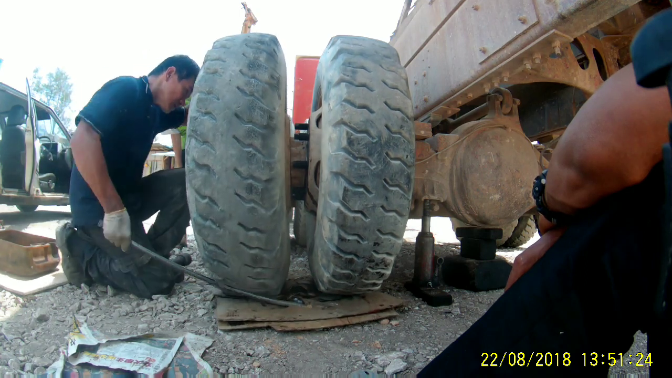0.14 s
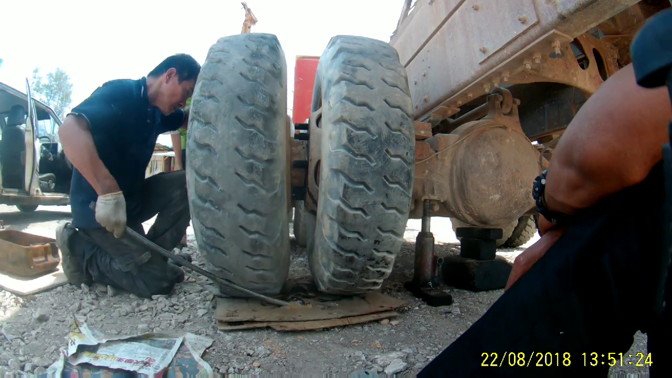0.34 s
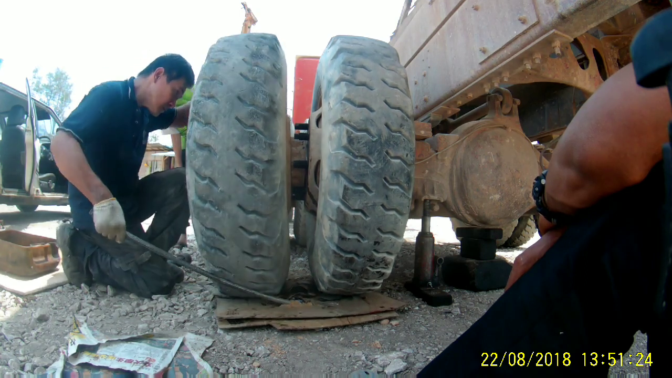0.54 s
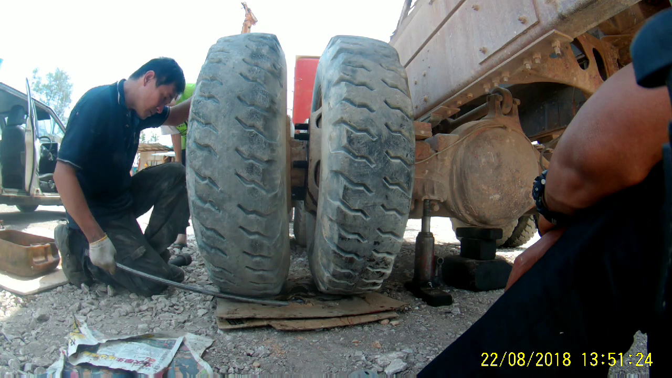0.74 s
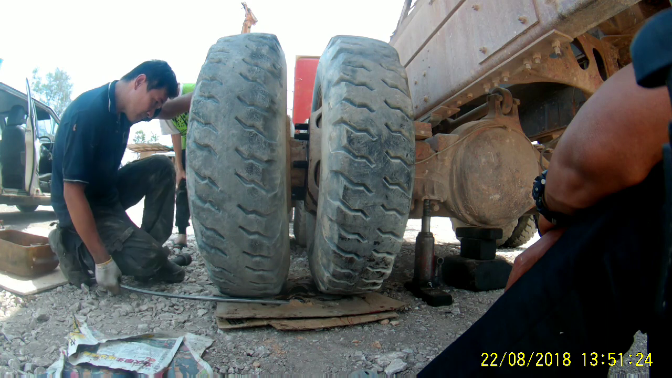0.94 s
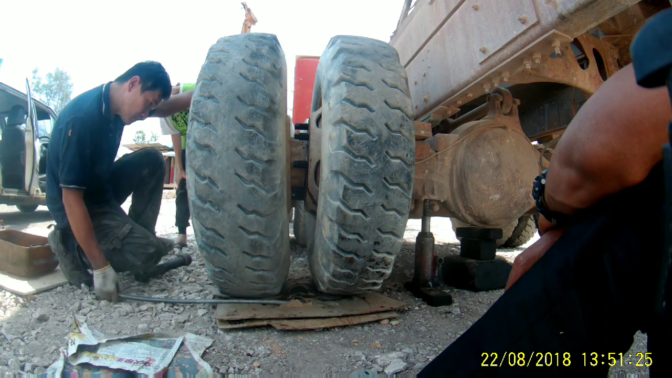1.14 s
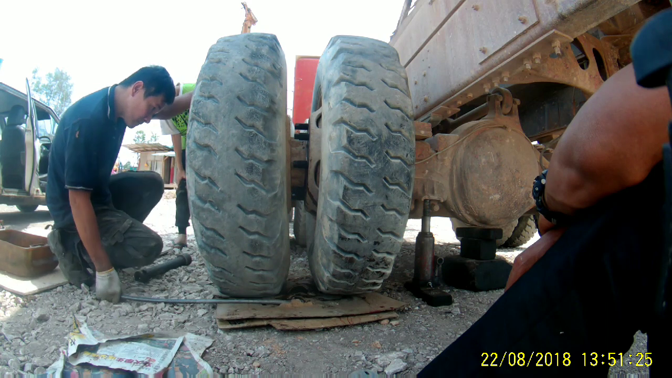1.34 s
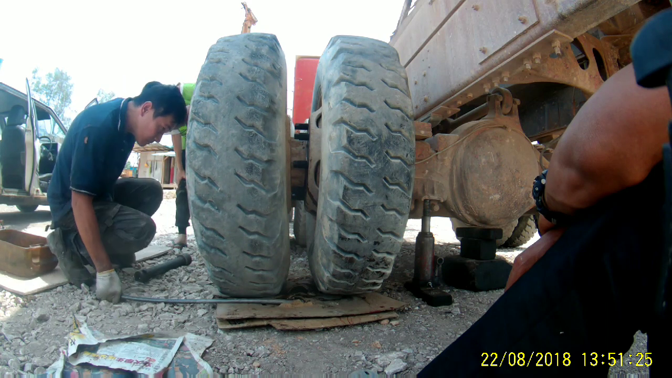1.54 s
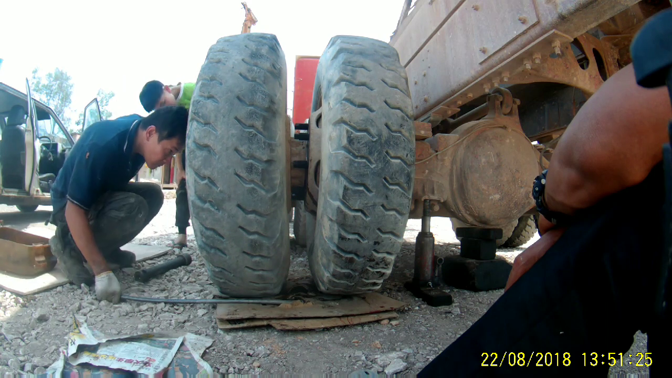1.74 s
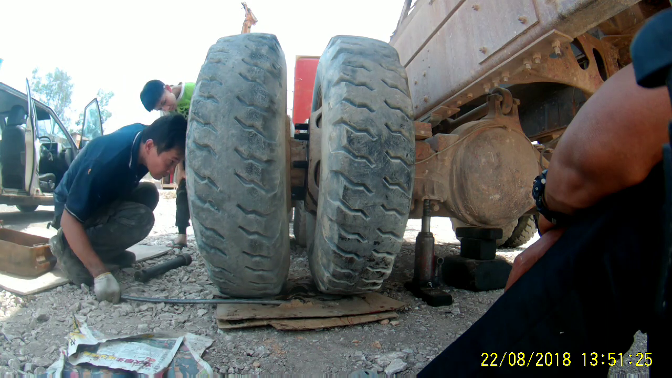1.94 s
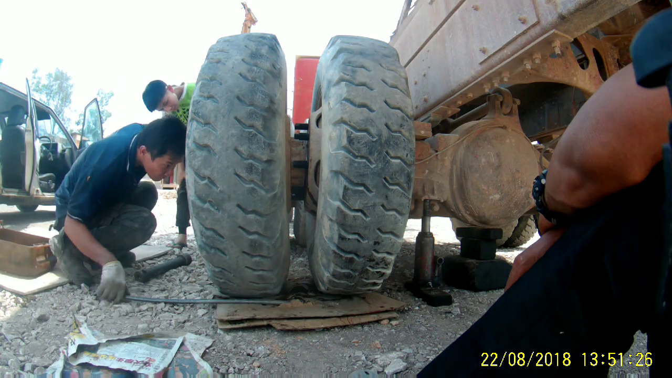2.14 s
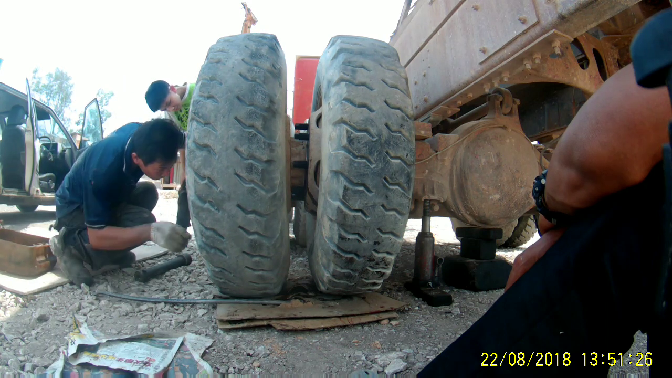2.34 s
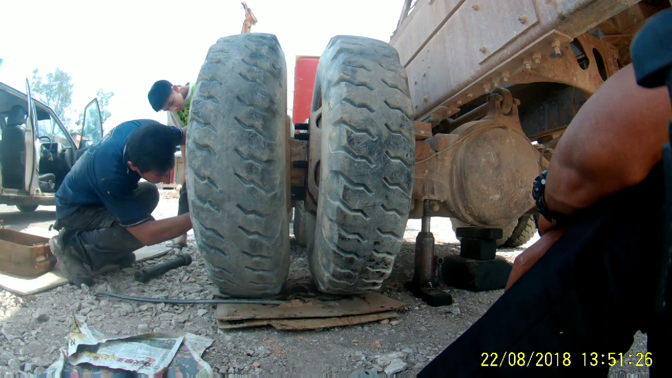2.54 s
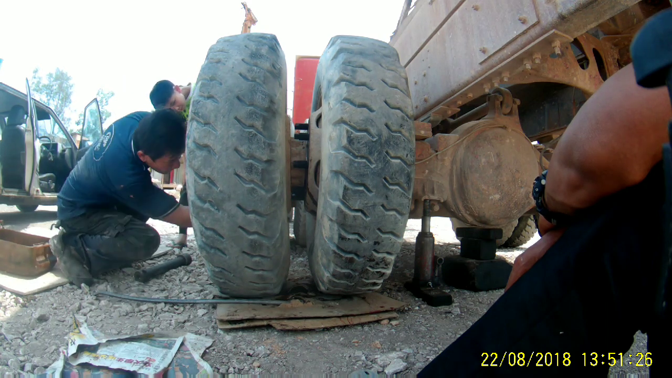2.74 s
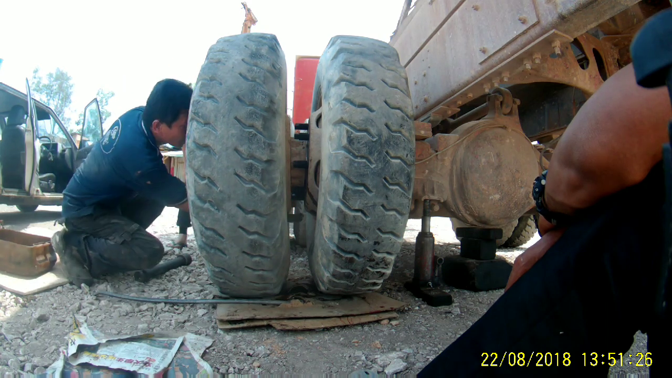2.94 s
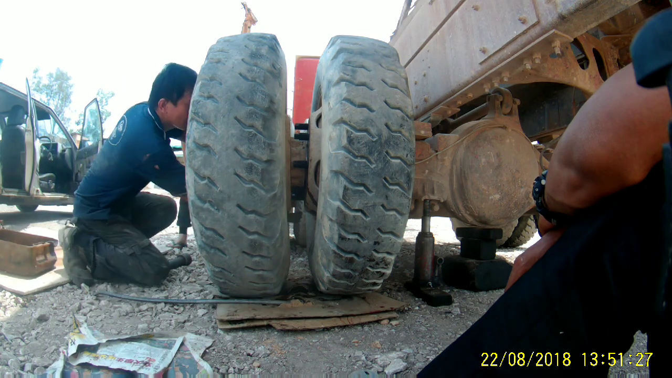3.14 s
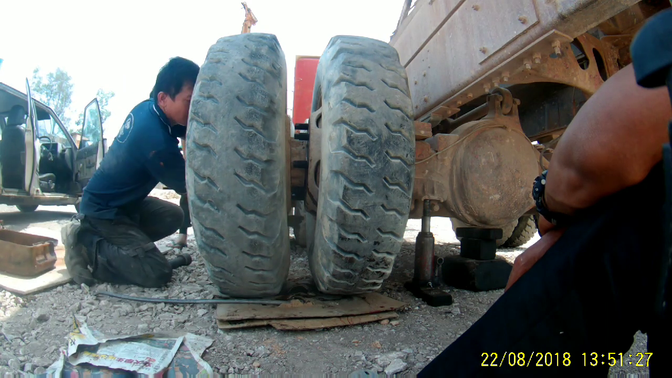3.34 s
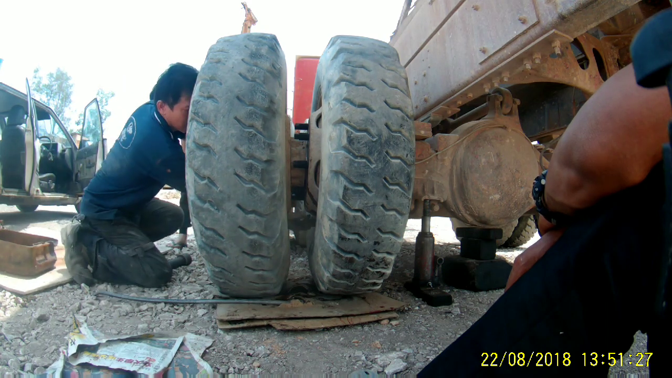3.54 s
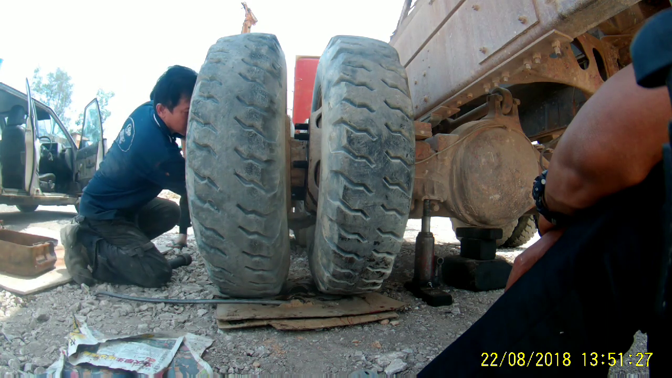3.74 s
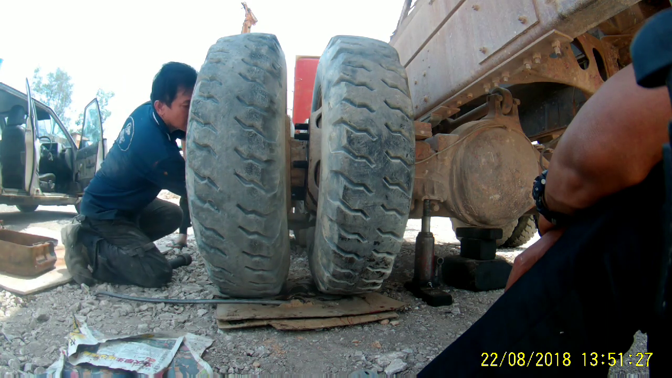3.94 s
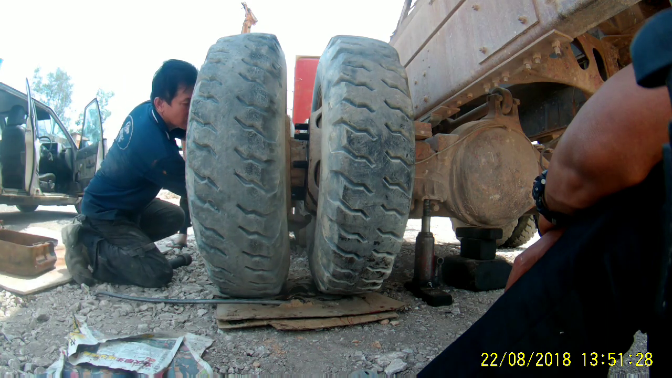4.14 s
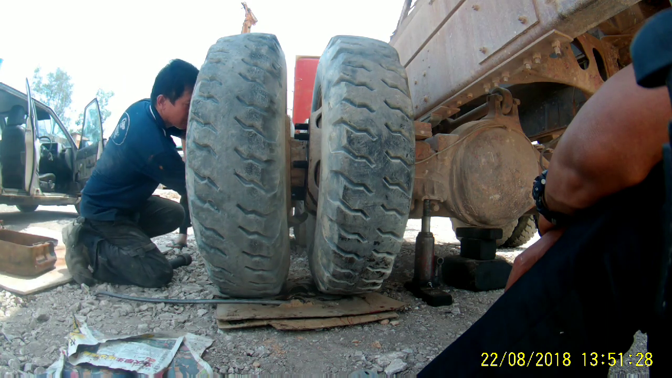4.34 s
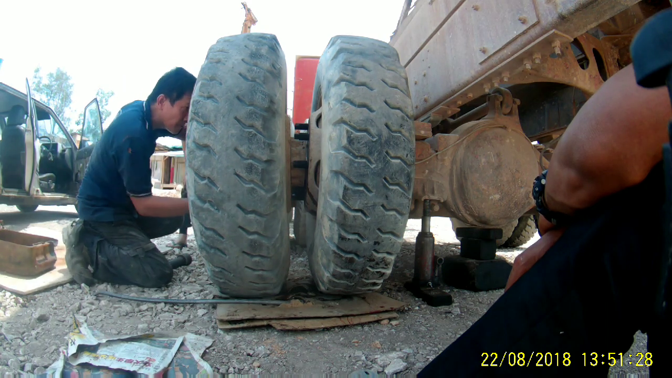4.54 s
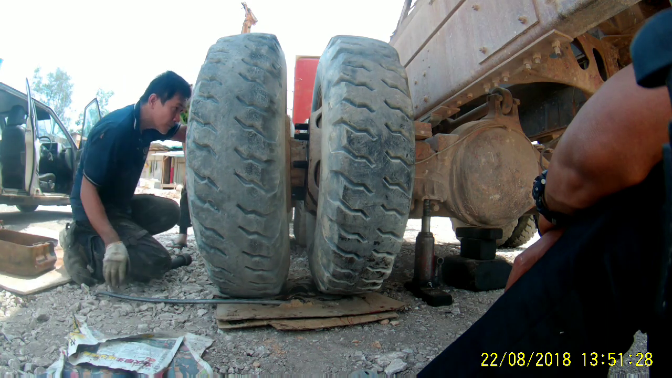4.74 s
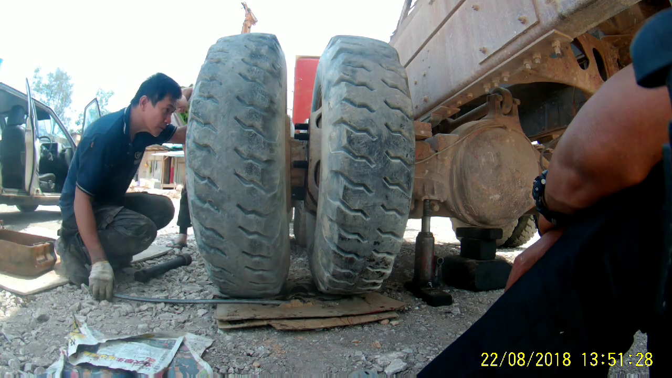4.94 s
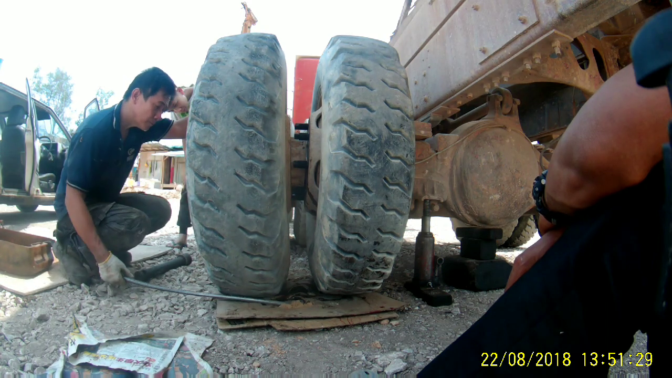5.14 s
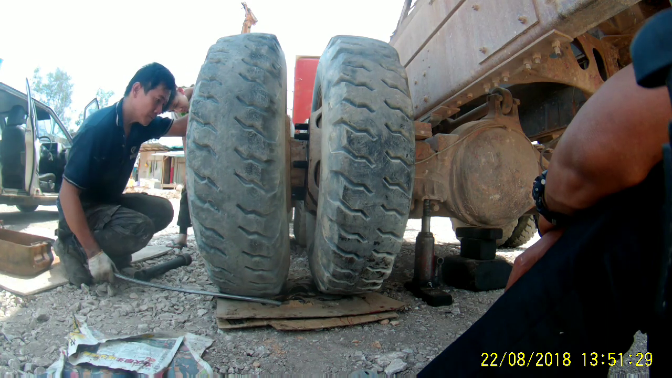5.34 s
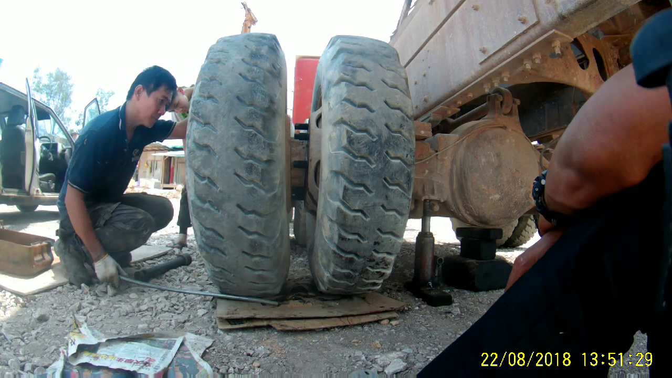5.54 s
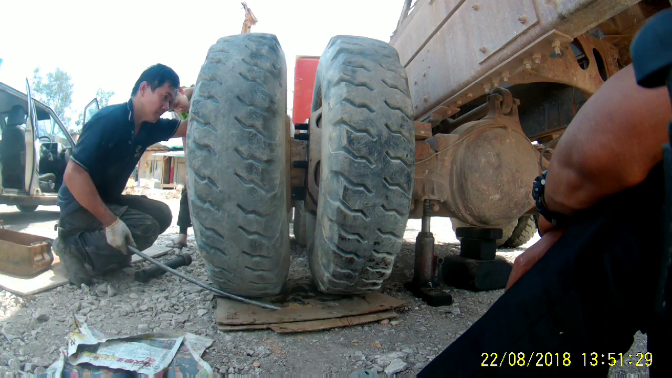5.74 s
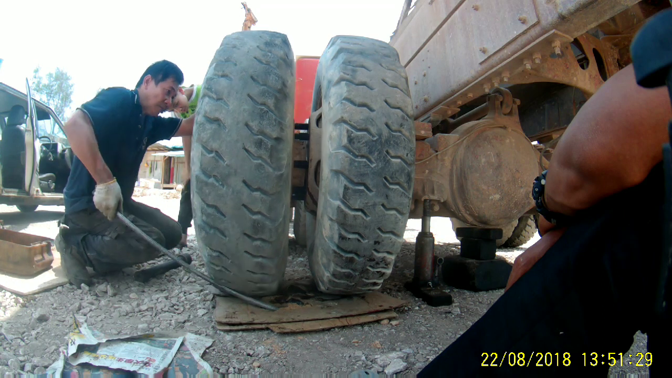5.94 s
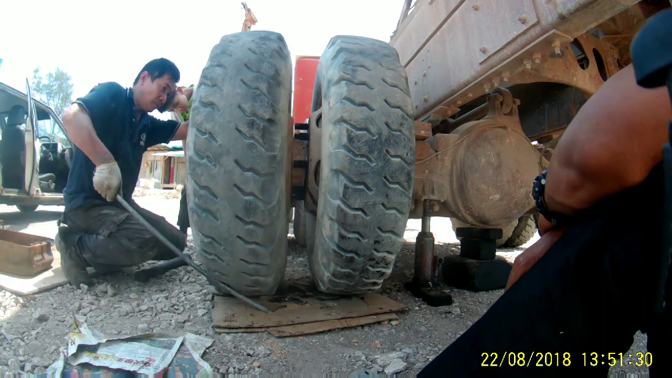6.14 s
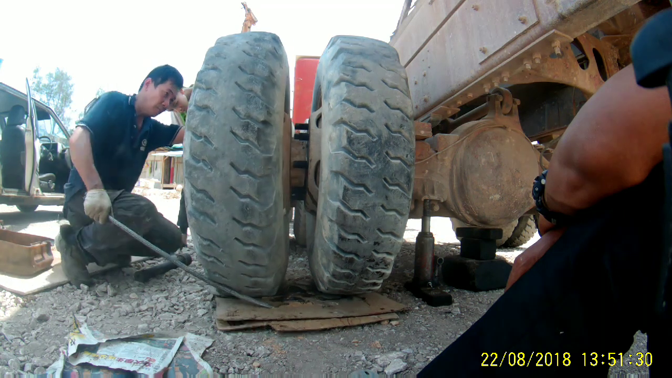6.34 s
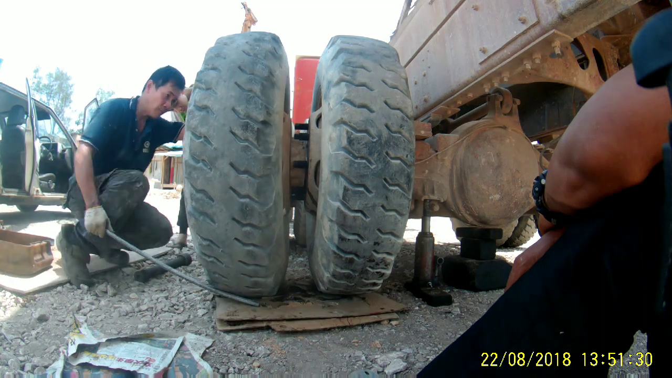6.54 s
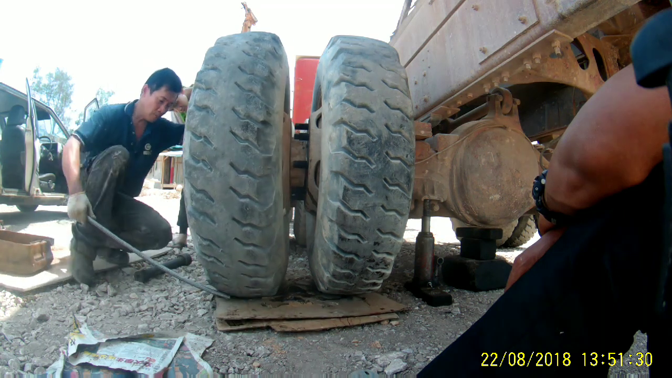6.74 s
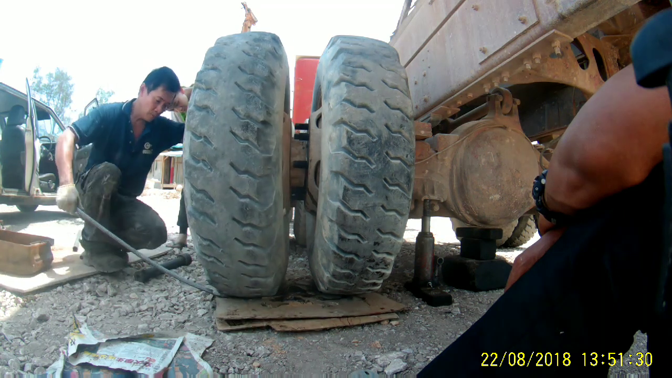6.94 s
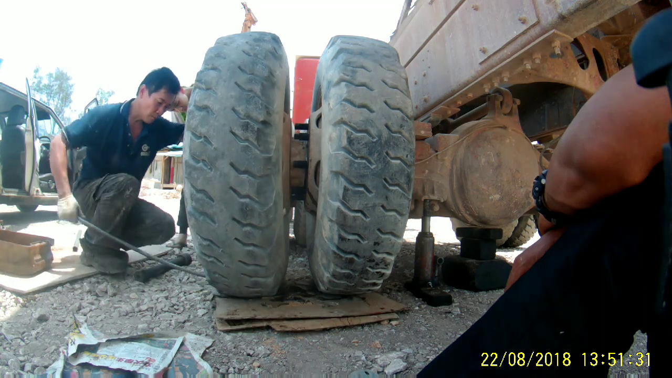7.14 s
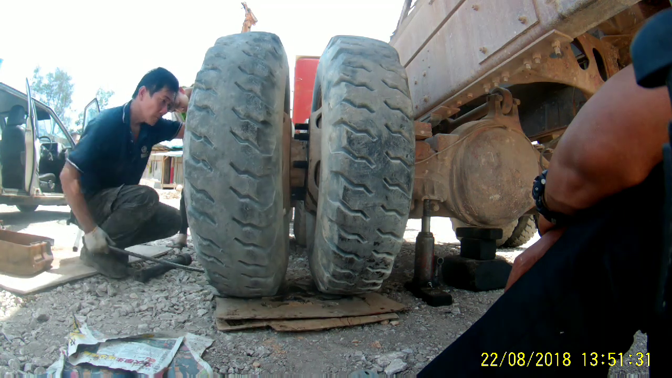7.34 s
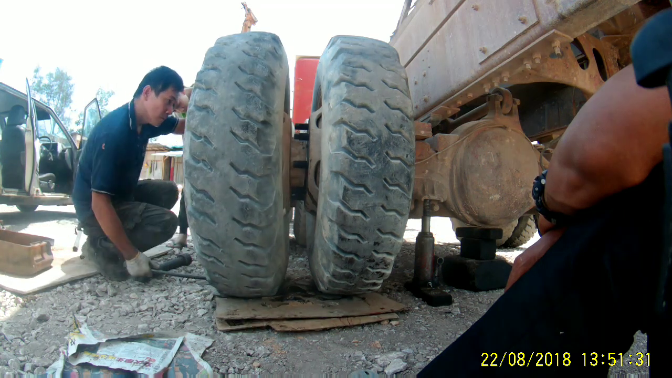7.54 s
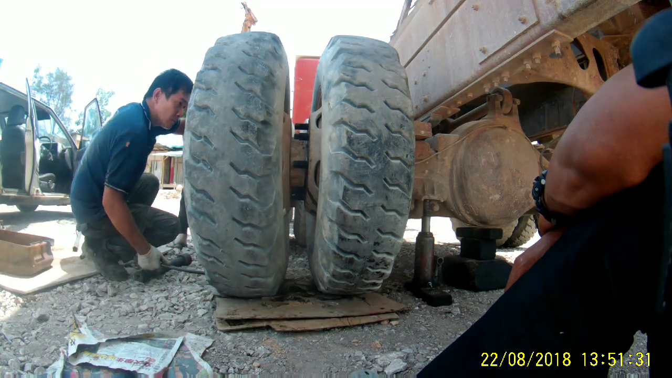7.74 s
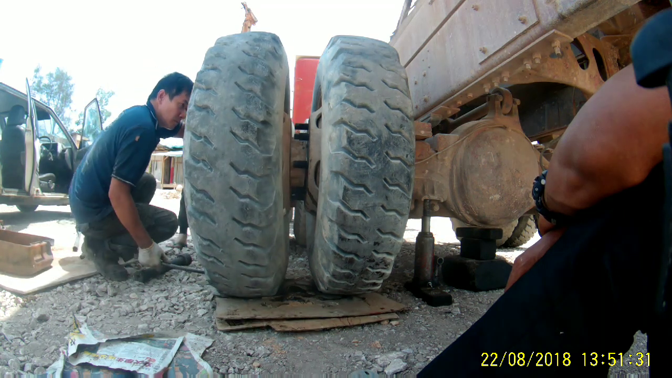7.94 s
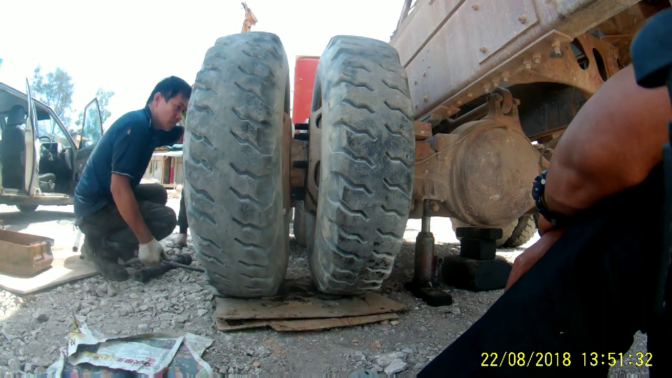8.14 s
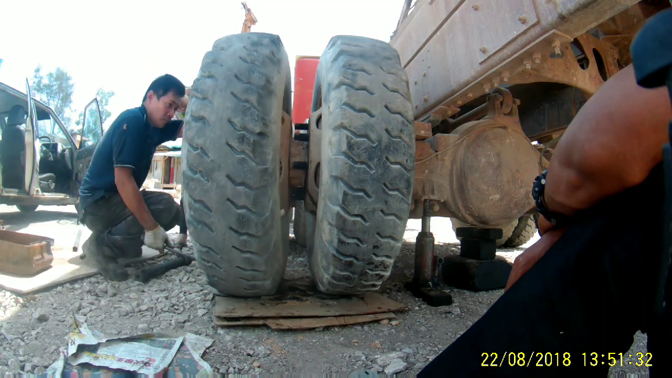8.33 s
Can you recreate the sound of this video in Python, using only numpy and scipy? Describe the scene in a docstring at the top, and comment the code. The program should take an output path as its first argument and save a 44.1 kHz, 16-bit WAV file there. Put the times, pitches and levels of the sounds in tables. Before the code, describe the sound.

Two heavy, booming metallic knocks break a sparse run of gravel snaps, dull bumps and faint steel clinks over a steady low hum outdoors.

```python
"""Two heavy close knocks: low booming modes, higher ringing modes, a noisy wash and a slow low push.
Tyre work outdoors: a steel lever drags over gravel, is laid down with a clink, clanks on a loose tool
and taps the truck's hub: struck modes. Stones snap, crunch and slide as the worker shifts: bursts and grains
of coloured noise; dull bumps and thuds are damped notes.
Beneath lie a steady hum, a slowly beating drone, faint whines, and outdoor air, rumble and flickering treble.
"""
import sys
import numpy as np
from scipy import signal
from scipy.fft import rfft, irfft, next_fast_len
from scipy.io import wavfile
from scipy.ndimage import map_coordinates

SR = 44100
rng = np.random.default_rng(int(sys.argv[2]) if len(sys.argv) > 2 else 0)


def generate_wav(sig):
    """Save sig (samples, or channels by samples) to the path in sys.argv[1] as 16-bit PCM at SR."""
    pcm = np.round(np.clip(np.atleast_2d(sig).T, -1, 1) * 32767).astype(np.int16)
    wavfile.write(sys.argv[1], SR, pcm)


N = 369116

# All levels are relative, before the mix and the microphone.
# Heavy close knocks: t/s, level/dB, boom corner f/Hz, ringing/dB, low push/dB, time to half choke/s
HEAVY_KNOCKS = [(6.046, -8.5, 580, 1.5, -17, 0.14), (6.2047, -8, 224, -9, -11.5, 0.048)]
# Low booming modes, before the choke: f/Hz, level/dB, t60/s
BOOM_MODES = [(145, -19, .18), (180, -7, 0.18), (212.6, -6, 0.49), (250, 2.5, 0.043), (239, -2, 0.079),
              (333, 1, 0.088), (391, -16, 0.37), (440, -10, 0.083), (537, -18.5, 0.23), (625, -8, 0.066),
              (790, -19, 0.096)]
# Higher ringing modes: f/Hz, level/dB, t60/s
RING_MODES = [(1228, -22, .2), (1255, -16, .09), (1500, -12, .085), (1580, -22, .09), (1712, -24, .075),
              (2046, -36, .1), (10900, -41, .08), (11890, -45, .16), (12345, -45, .16), (13340, -45, .14),
              (13610, -41, .07)]
# Lever set down on stones: t/s, level/dB, brightest f/Hz, chatter/dB
LEVER_LANDINGS = [(1.166, -43, 2200, -8), (1.263, -52, 7000, -2), (2.271, -43.5, 7000, -4.5),
                  (7.688, -49, 6000, -14)]
# Lever modes: f/Hz, level/dB, t60/s
LEVER_MODES = [(744, 9.5, 0.072), (1830, -7, .1), (2200, -4, 0.085), (2960, -9, 0.11), (4650, -9, 0.13),
               (5600, -21, 0.16), (5620, -10, 0.14), (6480, -9, .09), (7682, -17, 0.18), (8970, -17, .2),
               (9911, -23, .18)]
# Clanks on a loose tool: t/s, level/dB, brightest f/Hz, chatter/dB
TOOL_CLANKS = [(7.3635, -38, 3750, -5.5), (7.398, -36.5, 3000, -10), (7.4055, -41, 5200, -16),
               (7.590, -59, 7000, -6), (7.641, -51, 7900, -2)]
# Loose tool modes: f/Hz, level/dB, t60/s
TOOL_MODES = [(1650, -8, .06), (1900, -7, .06), (2145, -7, .06), (2579, -3, .056), (2891, -5, .1),
              (3720, -12, .06), (4380, -9, .045), (4585, -2, .06), (5290, -12, .07), (5525, -2, .075),
              (5900, -2, .056), (6928, -16, .08), (7440, -15, .09), (8900, -13, .08), (10360, -22, .08),
              (13950, -21, .08)]
# Light taps on the hub behind the tyre: t/s, level/dB, brightest f/Hz, chatter/dB
HUB_TAPS = [(3.128, -51.5, 1500, -13), (3.536, -55.5, 1600, 1), (3.667, -41.5, 2000, -16),
            (4.175, -45.5, 2600, -6)]
# Modes of a fitting on the hub: f/Hz, level/dB, t60/s
HUB_MODES = [(1647, -4.5, 0.17), (2000, 7.5, 0.013), (2190, -1, 0.025), (2730, -20, .03), (14200, -11, .05)]
# Single stones snapping under steel and boots: t/s, level/dB, sharp edge/dB
STONE_SNAPS = [(0.1972, -29, -8), (0.2712, -20.5, -22), (0.3116, -24, -11), (0.33, -25, -9.5),
               (0.385, -29, -25), (1.437, -40, -2), (1.667, -32, -16), (1.944, -30.5, -22),
               (2.2196, -35, -10), (5.063, -29, -14.5), (5.0819, -18.5, -20.5), (5.258, -26.5, -14),
               (5.3634, -37.5, 1.5), (5.9202, -28, -30), (6.118, -11, -10), (6.1256, -17.5, -10),
               (6.146, -18, -13.5), (6.1555, -15.5, -17.5), (6.33, -37, -7), (6.371, -28, -23),
               (6.719, -29, -8.5), (7.5634, -34.5, -21)]
# Dull bumps on ground and boards: t/s, level/dB, f/Hz
GROUND_BUMPS = [(0.188, -26, 408), (1.411, -19, 814), (1.42, -16.5, 543), (1.428, -22, 338),
                (1.452, -22.5, 510), (1.496, -22.5, 322), (1.513, -25, 339), (1.788, -22.5, 777),
                (2.73, -35, 775), (5.259, -21.5, 786), (6.126, -20, 390), (6.482, -24.5, 680),
                (7.016, -27.5, 331), (7.073, -24, 494), (7.638, -26, 404), (7.737, -23.5, 500),
                (7.794, -20.5, 464), (7.802, -19.5, 286), (7.896, -32, 363)]
# Worker's weight landing on the ground: t/s, level/dB, f/Hz
BODY_THUDS = [(0.192, -30.5, 141), (0.253, -30, 129), (0.349, -30, 154), (1.425, -40, 130),
              (1.872, -36, 119), (5.282, -37, 124), (5.914, -25, 133), (7.57, -37, 150),
              (7.797, -27.5, 170)]
# Gravel crunching under shifting weight: t/s, length/s, level/dB, growth/dB, low grind/dB
GRAVEL_CRUNCHES = [(0.188, 0.073, -45, -1, 0.5), (0.275, 0.14, -43.5, -6, -3),
                   (1.419, .1, -48.5, -10.5, 5.5), (1.64, 0.12, -40.5, 3.5, -15),
                   (1.847, 0.12, -49, -2.5, -3.5), (2.708, 0.055, -59, -3, -14),
                   (5.071, .12, -40, -0.5, -16), (5.826, .02, -47, 0, -10), (5.949, 0.073, -45, 7, 1),
                   (6.253, 0.14, -49.5, 8, 0.5), (7.594, 0.051, -50.5, 2, 4), (7.745, 0.057, -43, 1.5, -8),
                   (7.885, 0.16, -53, -2, 8), (8.331, 0.038, -44.5, 4, -8)]
# Lever tip sliding through grit: t/s, length/s, level/dB, growth/dB
TIP_SLIDES = [(0.09, 0.14, -59.5, 1), (0.28, 0.11, -58.5, -7), (0.825, 0.08, -54.5, -5),
              (5.37, 0.13, -53.5, 5), (5.615, 0.12, -51.5, 3), (5.92, .11, -60, -3), (6.05, 0.078, -50, 2),
              (6.53, 0.2, -56, 3.5)]

# Noise spectra: f/Hz, level/dB
KNOCK_WASH_SPECTRUM = [(50, -20), (130, 3.5), (380, 12), (700, -12), (950, -21), (1250, 6.5), (1600, -2),
                       (2200, -17), (3200, -29), (9000, -32), (12500, -25), (16000, -38)]
SNAP_BODY_SPECTRUM = [(200, -48), (600, 4), (1000, -8), (1450, 3.5), (1950, 1), (2700, -6.5), (3400, -19.5),
                      (8000, -41), (16000, -61)]
SNAP_EDGE_SPECTRUM = [(1000, -75), (2800, -22), (4000, -2), (5400, 0.5), (6500, -6.5), (8200, -5),
                      (9100, -12), (11500, -15), (14500, -14), (16000, -8.5)]
GRAVEL_SPECTRUM = [(70, -7), (130, 0.5), (340, 6), (620, 1), (820, 8), (1250, 0), (1550, 5), (2050, -4.5),
                   (2450, -6), (2950, -9.5), (3500, -25.5), (4400, -16.5), (5600, -18.5), (9000, -26),
                   (14100, -25), (16000, -52)]
GRIT_SPECTRUM = [(200, -52), (700, 13), (1050, -1), (1600, 8), (2400, 2), (3500, -10.5), (4600, -1),
                 (6500, -5), (8000, -1), (10400, -11), (14100, -15), (16000, -23)]
GROUND_SPECTRUM = [(60, -59), (130, 13), (350, 14.5), (800, 5.5), (1200, -7), (2000, -10.5), (3200, -29.5),
                   (8000, -27), (12000, -25), (16000, -45)]
AIR_SPECTRUM = [(180, -24.5), (300, -2.5), (400, -0.5), (600, -3), (800, -7.5), (1200, -11), (2000, -15),
                (2500, -17), (3100, -21), (5000, -25), (8000, -27.5), (9400, -38.5), (11000, -37),
                (14000, -48), (15800, -50)]
RUMBLE_SPECTRUM = [(20, -7), (45, 5.5), (80, 5), (130, 1), (170, 4.5), (280, 0), (380, -13.5), (600, -38.5)]

# Hum and its octave: rms level/dB
HUM_LEVELS_DB = [-41.5, -62.5]
# Two beating drones and their companions: f/Hz, rms level/dB
DRONE_TONES = [(51.32, -46.8), (52.66, -49.3), (78.35, -59), (102.6, -64), (105.3, -66)]
# Thin steady whines: f/Hz, rms level/dB
WHINE_TONES = [(11892, -85.5), (12344, -85.5)]

HUM_HZ = 227.5
CRUNCH_ATTACK_S, CRUNCH_RELEASE_S = 0.018, 0.034  # time constants, loading and unloading the stones
SLIDE_ATTACK_S, SLIDE_RELEASE_S = 0.027, 0.032  # time constants, tip gathering and losing speed
GRIND_DB = -1.5
CRACKS_PER_S, CRACK_DB, CRACK_SPREAD_DB = 50, -0.5, 3
LOW_CUT_HZ, TOP_HZ = 38, 15830


def amp(db):
    """Decibels to gain."""
    return 10 ** (np.asarray(db) / 20)


def unit(x):
    """Scale to rms 1."""
    return x / np.sqrt(np.mean(x ** 2) + 1e-20)


def clock(size):
    """Sample times in seconds."""
    return np.arange(size) / SR


def fade(t, t60_s):
    """Exponential decay by 60 dB in t60_s."""
    return np.exp(-np.log(1000) * t / t60_s)


def wobble(knots_per_s):
    """Smooth random curve through normally distributed knots."""
    knots = rng.standard_normal(int(N * knots_per_s / SR) + 4)
    return map_coordinates(knots, [clock(N) * knots_per_s])


def colour(x, spectrum):
    """Causal minimum-phase filter, rms gain 1 over frequency, through (f/Hz, level/dB) points."""
    size = 2 * next_fast_len(len(x) // 2 + 2048)
    hz, db = np.transpose(spectrum)
    log_hz = np.log(np.fft.rfftfreq(size, 1 / SR) + 1)
    gain = unit(amp(np.interp(log_hz, np.log(hz), db)))
    # fold the cepstrum to make the response causal
    cepstrum = irfft(np.log(gain))
    cepstrum[1:size // 2] *= 2
    cepstrum[size // 2 + 1:] = 0
    return irfft(rfft(x, size) * np.exp(rfft(cepstrum)), size)[:len(x)]


def noise(spectrum, size):
    """Coloured noise of rms 1."""
    return unit(colour(rng.standard_normal(size), spectrum))


def ring(modes, t, scatter_db):
    """Sum of damped modes, with random strengths at every strike."""
    total = np.zeros(len(t))
    for hz, db, t60_s in modes:
        strength = amp(db + scatter_db * rng.standard_normal())
        total += strength * fade(t, t60_s) * np.sin(2 * np.pi * hz * t)
    return total


def add(track, start_s, sound):
    """Mix a sound into the track at start_s."""
    start = round(start_s * SR)
    track[start:start + len(sound)] += sound[:max(N - start, 0)]


def heavy_knocks():
    """Each knock excites booming and ringing modes; a lower corner dulls the boom and slows its onset."""
    out, t = np.zeros(N), clock(SR * 3 // 4)
    for s, db, corner_hz, ringing_db, push_db, choke_s in HEAVY_KNOCKS:
        excited = [(hz, level - 10 * np.log10(1 + (hz / corner_hz) ** 4), t60_s)
                   for hz, level, t60_s in BOOM_MODES]
        boom = ring(excited, t, scatter_db=0.5)
        # the boom is choked faster than its modes decay
        boom = boom / (1 + (t / choke_s) ** 4)
        # one slowly decaying low mode
        push = ring([(129.2, push_db, 0.39)], t, scatter_db=4.5)
        rise = 1 - np.exp(-(1.13 * corner_hz * t) ** 2)
        ringing_rise = 1 - np.exp(-t / 0.0012)
        ringing = amp(ringing_db) * ring(RING_MODES, t, scatter_db=0.5) * ringing_rise
        # noisy wash with a fast and a slow decay
        wash_decay = amp(-19) * fade(t, 0.09) + amp(-27) * fade(t, 0.4)
        wash = noise(KNOCK_WASH_SPECTRUM, len(t)) * wash_decay
        click = amp(-30) * noise(SNAP_BODY_SPECTRUM, len(t)) * fade(t, 0.022)
        add(out, s, amp(db) * ((boom + push) * rise + ringing + wash + click))
    return out


def clinks(hits, steel_modes):
    """The place of contact picks which modes of a steel piece ring; it chatters briefly as it lands."""
    out, t = np.zeros(N), clock(SR // 3)
    for s, db, bright_hz, chatter_db in hits:
        # modes lose up to 7 dB away from the brightest frequency
        excited = [(hz, level - min(3 * np.log2(hz / bright_hz) ** 2, 7), t60_s)
                   for hz, level, t60_s in steel_modes]
        modes = ring(excited, t, scatter_db=1)
        rattle = noise(SNAP_BODY_SPECTRUM, len(t)) + 0.5 * noise(SNAP_EDGE_SPECTRUM, len(t))
        chatter = rattle * fade(t, 0.072)
        add(out, s, amp(db) * (0.72 * modes + amp(chatter_db) * chatter))
    return out


def stones():
    """A snap has a stony body and a sharp edge, each with a weaker, longer scatter under the truck."""
    out, t = np.zeros(N), clock(SR // 5)
    body_decay = fade(t, 0.022) + amp(-20) * fade(t, 0.13)
    edge_decay = fade(t, 0.012) + amp(-15) * fade(t, 0.08)
    for s, db, edge_db in STONE_SNAPS:
        body = noise(SNAP_BODY_SPECTRUM, len(t)) * body_decay
        edge = noise(SNAP_EDGE_SPECTRUM, len(t)) * edge_decay
        add(out, s, amp(db - 9) * (body + amp(edge_db + 5) * edge))
    return out


def ground():
    """A bump is one well damped note in a puff of dirt."""
    out, t = np.zeros(N), clock(SR // 5)
    soft_rise = 1 - np.exp(-t / 0.0007)
    for s, db, hz in GROUND_BUMPS:
        note = ring([(hz, -6, 0.04)], t, scatter_db=1)
        puff = amp(-10.5) * noise(GROUND_SPECTRUM, len(t)) * fade(t, 0.062)
        add(out, s, amp(db) * (note + puff) * soft_rise)
    return out


def underside(x):
    """Ground, tyres and truck bed return a short, dull scatter: convolution with decaying noise."""
    t = clock(SR // 6)
    spectrum = [(150, -19), (400, 1.5), (1500, -3), (3000, -6.5), (9000, -10), (16000, -19)]
    tail = noise(spectrum, len(t)) * fade(t, 0.11) * (t > 0.003)
    return signal.fftconvolve(x, tail / np.linalg.norm(tail))[:N]


def thuds():
    """Knees and boots give one soft, low push each."""
    out, t = np.zeros(N), clock(SR // 3)
    envelope = fade(t, 0.17) * (1 - np.exp(-t / 0.0024))
    for s, db, hz in BODY_THUDS:
        add(out, s, amp(db) * np.sin(2 * np.pi * hz * t) * envelope)
    return out


def effort(moves, attack_s, release_s):
    """Gain over time: each move builds up ahead of its start, grows or eases, then dies away."""
    t, gain = clock(N), np.zeros(N)
    for s, length_s, db, growth_db in moves:
        progress = np.clip((t - s) / length_s, 0, 1)
        before, after = np.maximum(s - t, 0), np.maximum(t - s - length_s, 0)
        edges = np.exp(-before / attack_s - after / release_s)
        gain = np.maximum(gain, amp(db + growth_db * (progress - 0.5)) * edges)
    return gain


def grains(rate_per_s, spread_db, life_s):
    """Noise made of many tiny fractures of uneven size; the power of each decays over life_s."""
    sizes = amp(spread_db * np.clip(rng.standard_normal(N), -2, 2))
    sizes = sizes * (rng.random(N) < rate_per_s / SR)
    power = signal.lfilter([1], [1, -np.exp(-1 / (life_s * SR))], sizes ** 2)
    return unit(np.sqrt(power) * rng.standard_normal(N))


def cracks(weight):
    """Small stones give way at random moments, louder under more weight."""
    sizes = amp(CRACK_DB + CRACK_SPREAD_DB * np.clip(rng.standard_normal(N), -2, 2))
    hits = (rng.random(N) < CRACKS_PER_S / SR) * sizes
    envelope = signal.fftconvolve(hits * weight, fade(clock(SR // 20), 0.014))[:N]
    return envelope * (noise(SNAP_BODY_SPECTRUM, N) + amp(-12) * noise(SNAP_EDGE_SPECTRUM, N))


def gravel():
    """Coarse stones crunch under weight and grind on the ground; fine grit hisses along sliding steel."""
    coarse = grains(rate_per_s=950, spread_db=3.6, life_s=0.002)
    fine = grains(rate_per_s=3000, spread_db=3.4, life_s=0.001)
    presses = [row[:4] for row in GRAVEL_CRUNCHES]
    grinds = [(s, length_s, db + low_db, growth_db)
              for s, length_s, db, growth_db, low_db in GRAVEL_CRUNCHES]
    weight = effort(presses, CRUNCH_ATTACK_S, CRUNCH_RELEASE_S)
    depth = effort(grinds, CRUNCH_ATTACK_S, CRUNCH_RELEASE_S)
    speed = effort(TIP_SLIDES, SLIDE_ATTACK_S, SLIDE_RELEASE_S)
    crunch = amp(-2.5) * weight * unit(colour(coarse, GRAVEL_SPECTRUM))
    grind = amp(GRIND_DB) * depth * noise(GROUND_SPECTRUM, N)
    slide = amp(2.5) * speed * unit(colour(fine, GRIT_SPECTRUM))
    return crunch + grind + cracks(weight) + slide


def tone(hz, rms_db, t):
    """Steady cosine of given rms level."""
    return np.sqrt(2) * amp(rms_db) * np.cos(2 * np.pi * hz * t)


def background():
    """Hum with slight phase drift, beating drone and faint whines over coloured-noise outdoor air."""
    t = clock(N)
    drift_t = t + 0.00003 * wobble(1.95)
    hum = sum(tone(HUM_HZ * (k + 1), db, drift_t) for k, db in enumerate(HUM_LEVELS_DB))
    # drone tones align in phase at 0.145 s
    drone = sum(tone(hz, db, t - 0.145) for hz, db in DRONE_TONES)
    whine = sum(tone(hz, db, t) for hz, db in WHINE_TONES)
    air = amp(-55 + 1.47 * wobble(4.34)) * noise(AIR_SPECTRUM, N)
    rumble = amp(-49.5 + 0.18 * wobble(2.65)) * noise(RUMBLE_SPECTRUM, N)
    # a narrow band of treble flickers
    flicker = amp(2.2 * wobble(45))
    sizzle_spectrum = [(8300, -25), (8900, -3), (9300, 0), (10000, -5.5), (10900, -22)]
    sizzle = amp(-73.5) * flicker * noise(sizzle_spectrum, N)
    return hum + drone + whine + air + rumble + sizzle


def scene():
    """All sources at one microphone; only the small impacts get the underside scatter."""
    steel = clinks(LEVER_LANDINGS, LEVER_MODES) + clinks(TOOL_CLANKS, TOOL_MODES) + clinks(HUB_TAPS, HUB_MODES)
    small = steel + stones() + ground()
    scatter = amp(-12.5) * underside(small)
    return (heavy_knocks() + small + scatter + thuds() + gravel() + background())[None]


def record(dry):
    """A small microphone loses the deepest bass; nothing is kept above its band limit."""
    low_cut = signal.butter(2, LOW_CUT_HZ, "high", fs=SR, output="sos")
    thin = signal.sosfilt(low_cut, dry)
    size = next_fast_len(N + SR // 2)
    in_band = np.fft.rfftfreq(size, 1 / SR) < TOP_HZ
    return irfft(rfft(thin, size) * in_band, size)[:, :N]


dry = scene()
out = record(dry)
generate_wav(out)
```